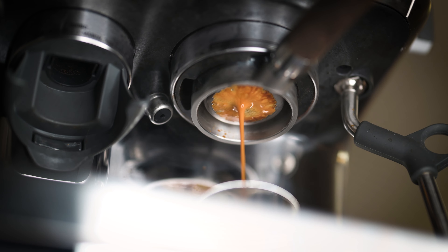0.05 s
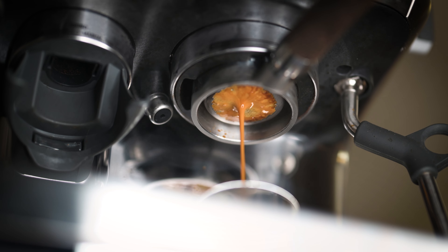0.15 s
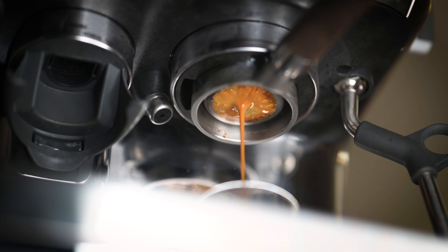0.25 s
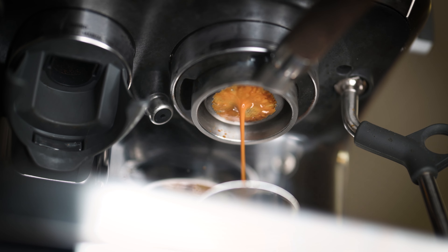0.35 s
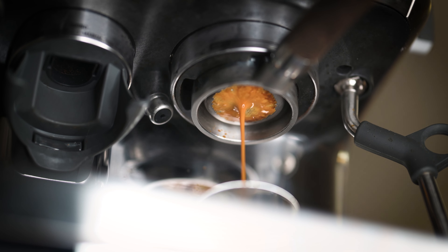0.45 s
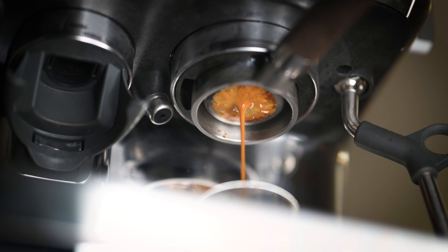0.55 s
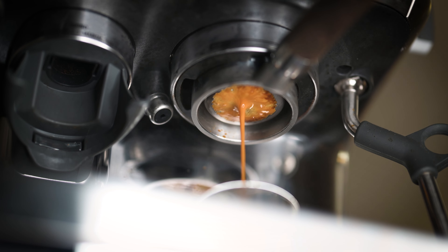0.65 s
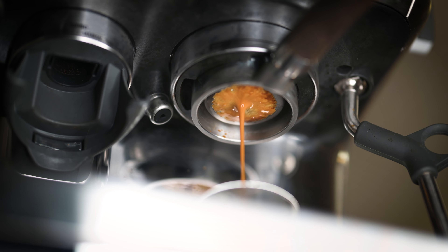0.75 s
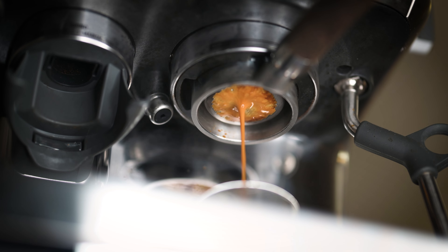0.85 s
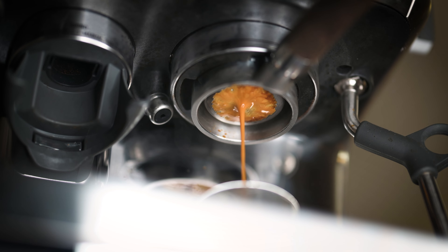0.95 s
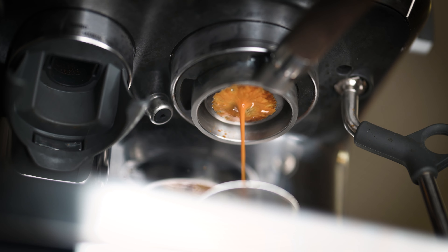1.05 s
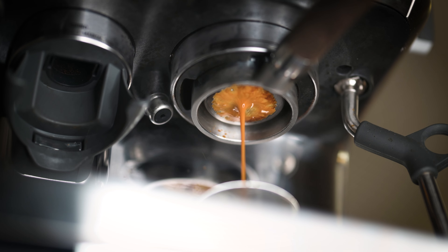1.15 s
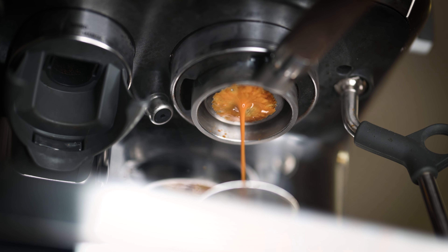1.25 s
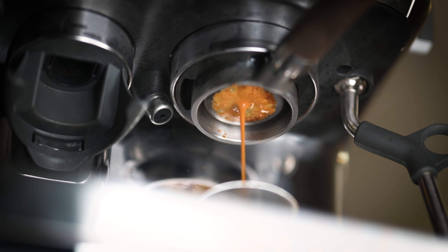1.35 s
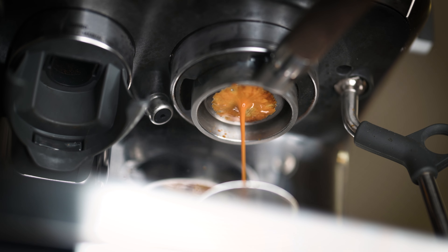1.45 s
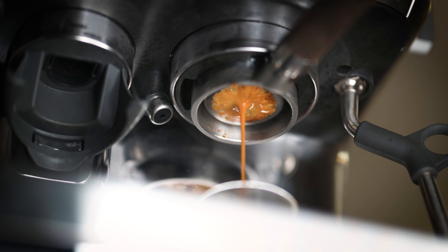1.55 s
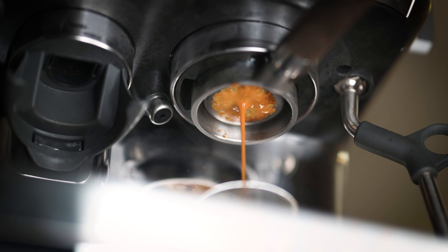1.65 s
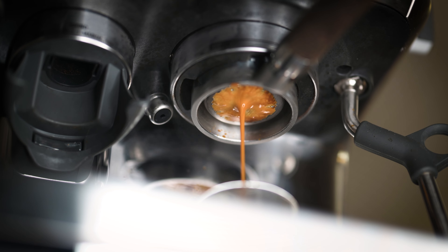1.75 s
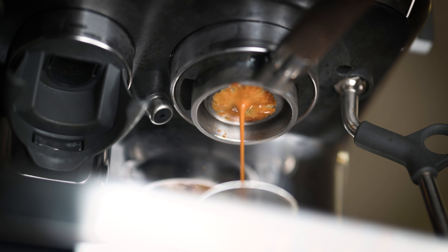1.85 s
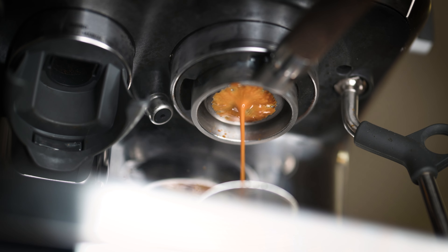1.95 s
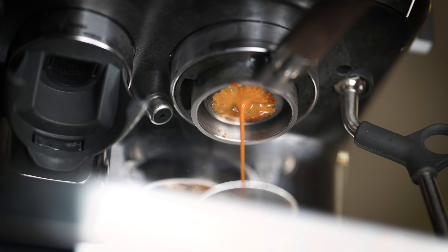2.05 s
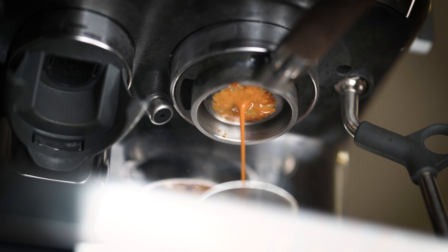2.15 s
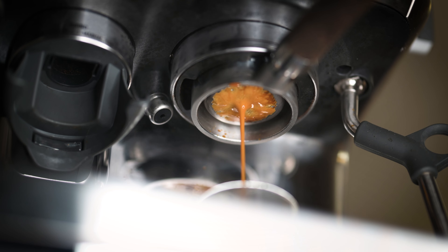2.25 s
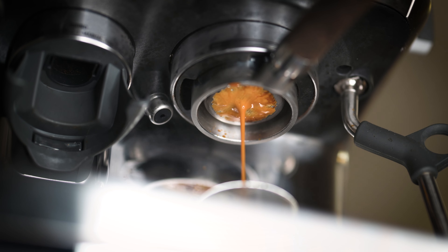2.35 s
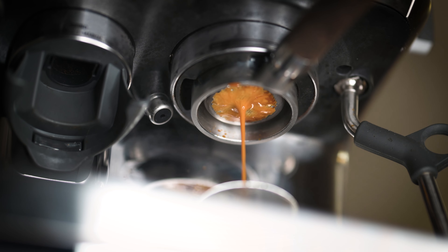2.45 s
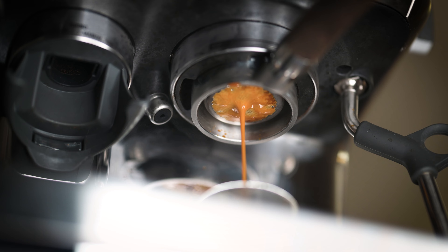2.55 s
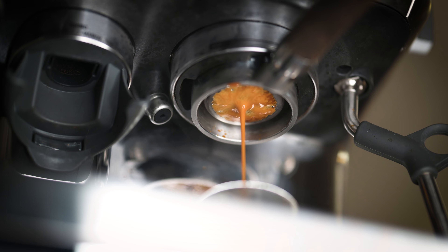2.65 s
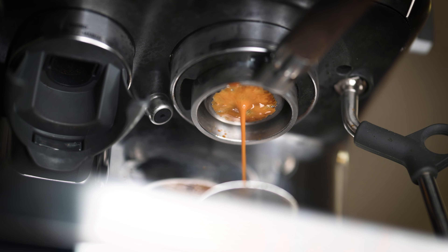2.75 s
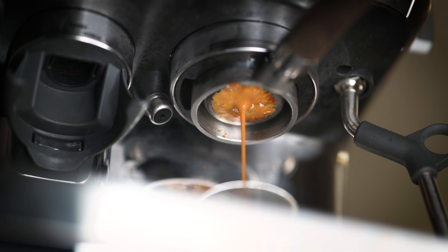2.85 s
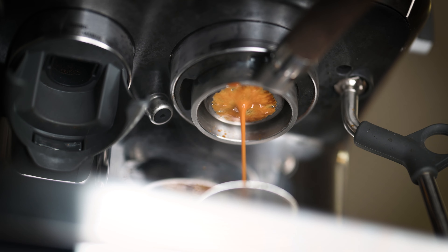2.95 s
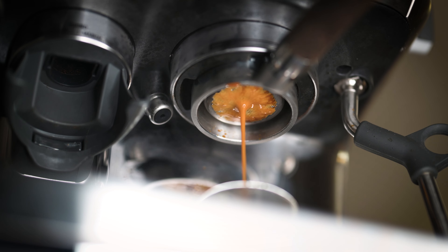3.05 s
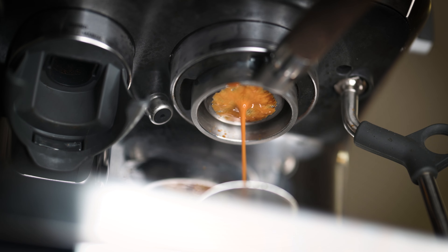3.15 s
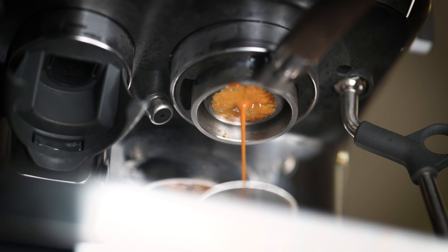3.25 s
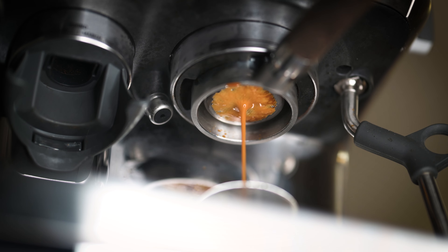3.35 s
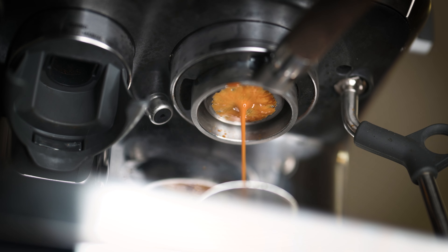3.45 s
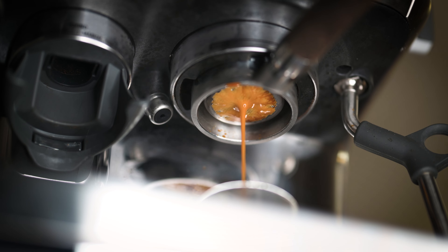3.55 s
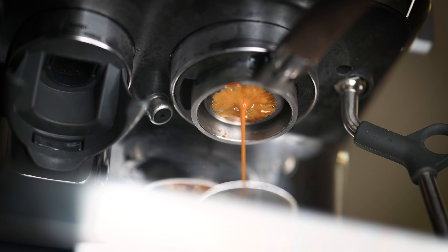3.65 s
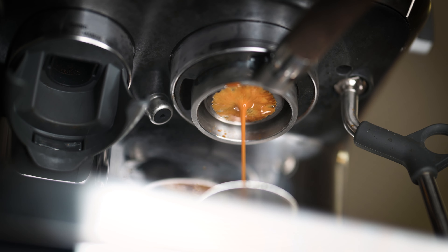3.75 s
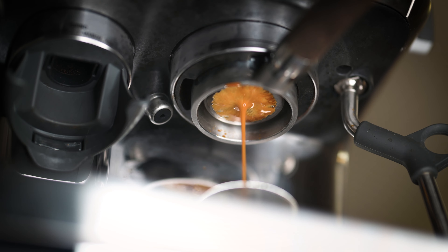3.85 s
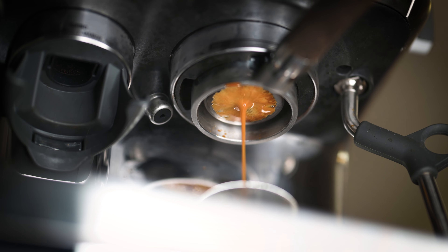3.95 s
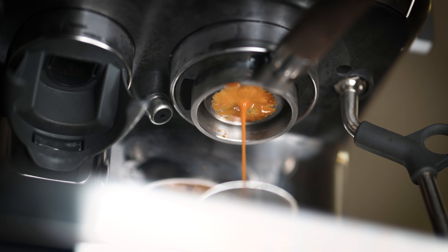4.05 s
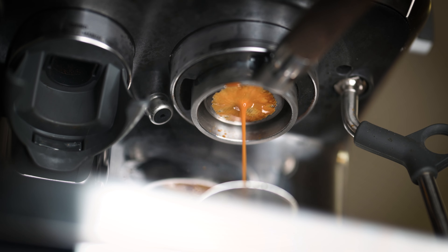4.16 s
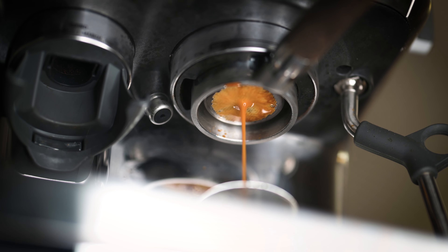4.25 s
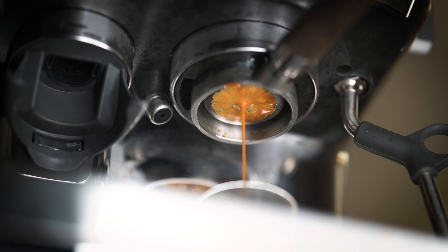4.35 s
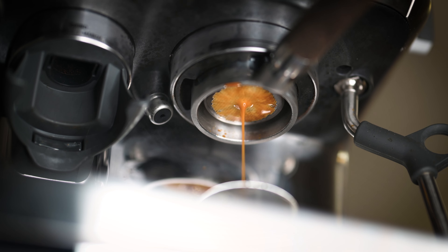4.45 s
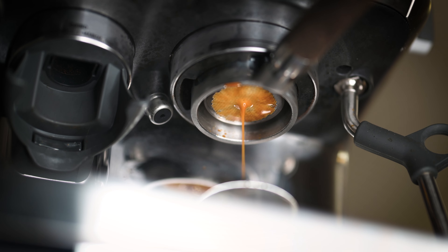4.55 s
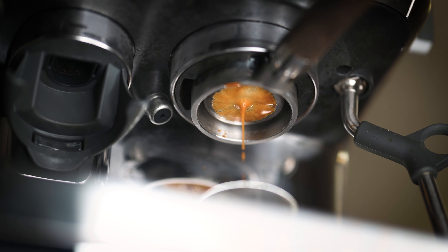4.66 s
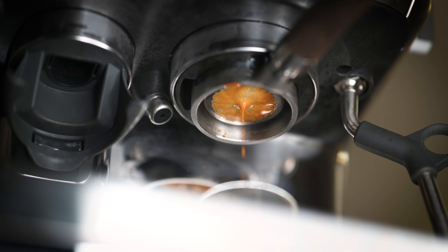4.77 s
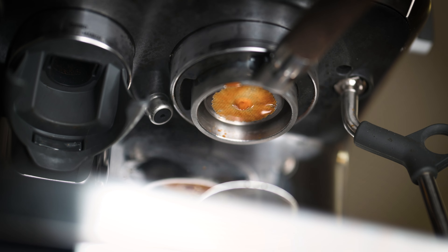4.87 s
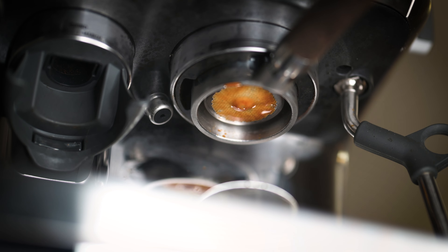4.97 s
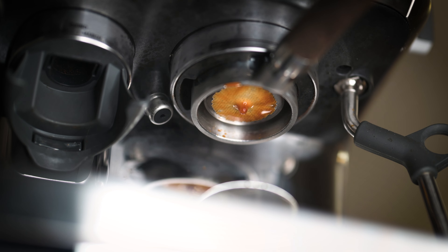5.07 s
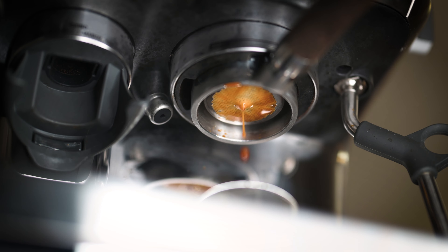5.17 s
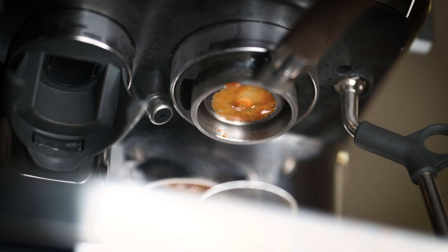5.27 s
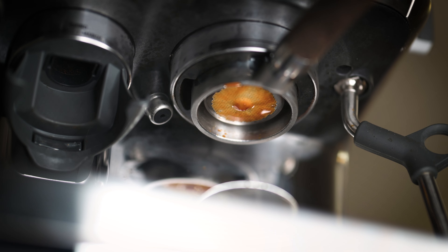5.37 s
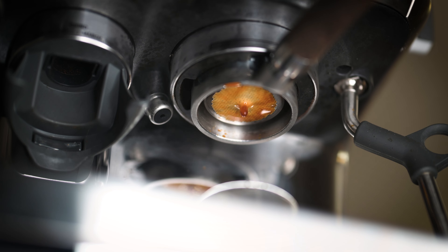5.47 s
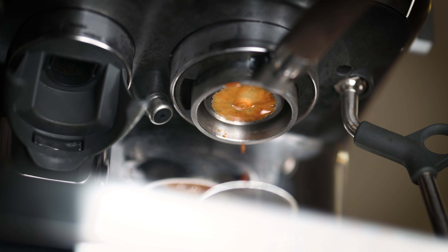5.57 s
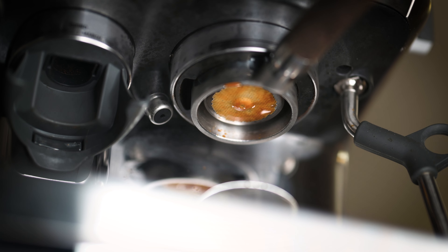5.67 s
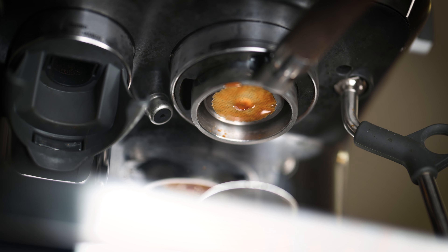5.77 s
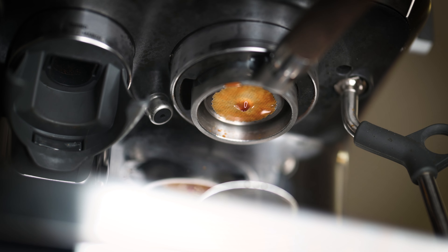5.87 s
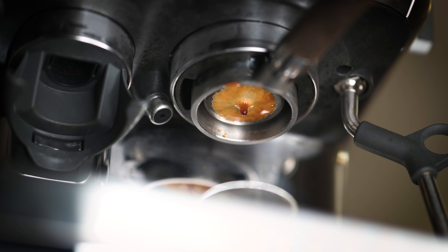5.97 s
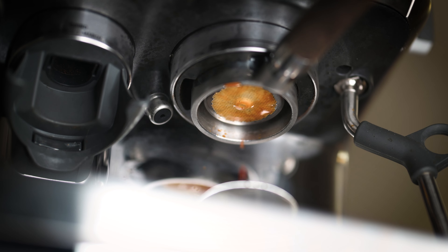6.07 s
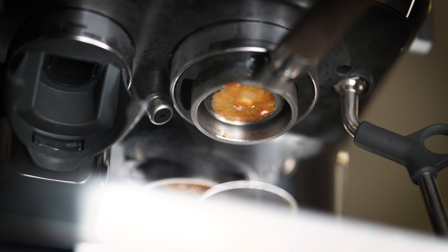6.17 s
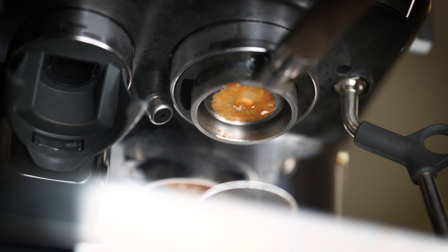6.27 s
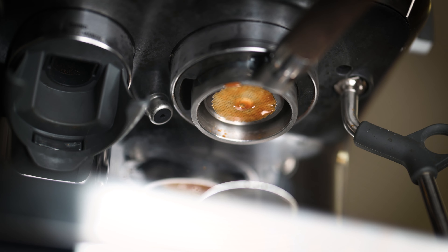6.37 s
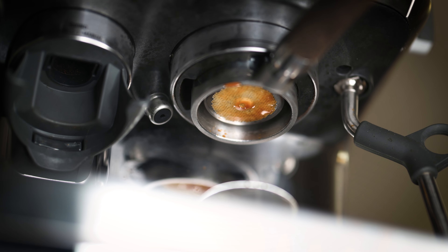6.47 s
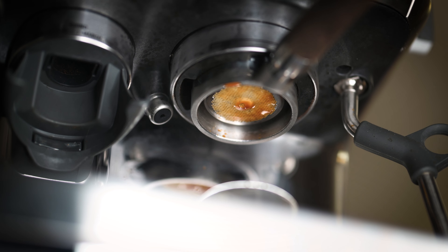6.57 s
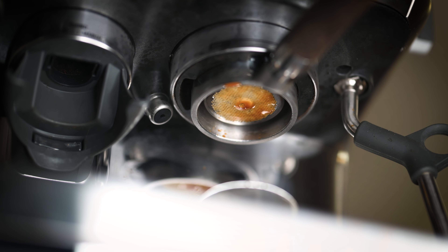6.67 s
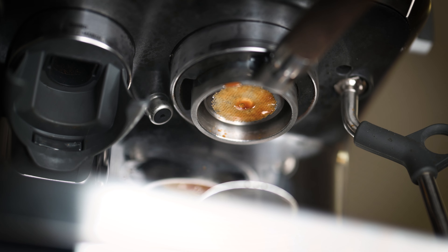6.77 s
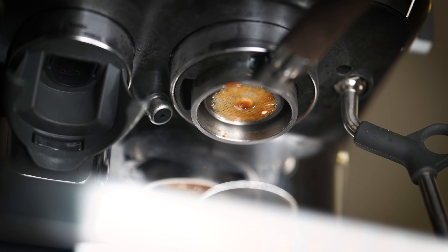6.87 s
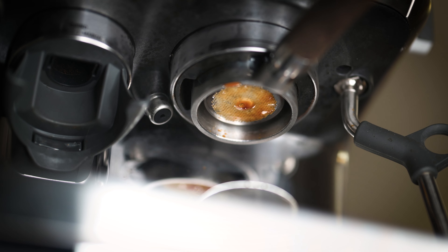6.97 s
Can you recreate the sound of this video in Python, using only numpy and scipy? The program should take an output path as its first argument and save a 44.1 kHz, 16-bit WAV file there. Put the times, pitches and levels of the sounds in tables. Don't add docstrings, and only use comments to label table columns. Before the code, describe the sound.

A vibrating coffee pump drones and buzzes for about three seconds, metal rattling and water fizzing, with scattered creaks. The buzz dies abruptly into gritty creaks and small clicks of a turning lever, ended by one loud metallic slam and quick rebounds. Then come palm rubbing, tiny skin squeaks, light knocks and hollow panel thumps, over low hum. Captured close in stereo in a small, slightly reverberant kitchen.

```python
import sys
import numpy as np
from scipy import signal
from scipy.fft import rfft, irfft, next_fast_len
from scipy.io import wavfile
from scipy.ndimage import map_coordinates

SR = 44100
rng = np.random.default_rng(int(sys.argv[2]) if len(sys.argv) > 2 else 0)


def store_wav(level_fs):
    pcm = np.round(np.clip(np.atleast_2d(level_fs), -1, 1) * 32767)
    wavfile.write(sys.argv[1], SR, pcm.T.astype(np.int16))


def convert_level_to_amplitude(level_db):
    exponent = np.asarray(level_db, float) / 20
    return 10 ** exponent


N = 309582
TIME_S = np.arange(N) / SR
MAINS_HZ = 59.989
OFF_S = 3.289


def unit(x):
    return x / np.sqrt(np.mean(x ** 2) + 1e-20)


def along(points, hz):
    f, v = np.transpose(points)
    return np.interp(np.log(hz + 1), np.log(f + 1), v)


def curve(rows):
    s, value = np.transpose(rows)
    return np.interp(TIME_S, s, value)


def wobble(rate):
    coarse = np.arange(0, N + 32, 32)
    knots = rng.standard_normal(int(N * rate / SR) + 5)
    return np.interp(np.arange(N), coarse, map_coordinates(knots, [coarse * rate / SR]))


def between(start_s, end_s, fade_s):
    inside_s = np.minimum(TIME_S - start_s, end_s - TIME_S)
    return np.clip(inside_s / fade_s + .5, 0, 1)


def dying(t60):
    return -60 * np.maximum(TIME_S - OFF_S, 0) / t60


def filtered(x, response):
    m = next_fast_len(N + SR // 2)
    return irfft(rfft(x, m) * response(np.fft.rfftfreq(m, 1 / SR)), m)[..., :N]


def modes(peaks):
    def response(f):
        total = 0
        for k, (centre, width, db) in enumerate(peaks):
            damping = 1j * f * width
            total = total + (-1) ** k * convert_level_to_amplitude(db) * damping / (centre * centre - f * f + damping)
        return total
    return response


def band(spectrum, lo_hz=0, hi_hz=SR):
    return lambda f: convert_level_to_amplitude(along(spectrum, f)) / (1 + (lo_hz / (f + 1)) ** 6) / (1 + (f / hi_hz) ** 6)


def hiss(response, gate=1):
    return unit(filtered(gate * rng.standard_normal((2, N)), response))


def lasting(rows, t60):
    return [(*row, t60) for row in rows]


def bursts(rows, column, shorter):
    x, t = np.zeros(N + SR), np.arange(SR // 3) / SR
    noise = rng.standard_normal((len(rows), len(t)))
    noise[:, :4] = 1.5 * np.sign(noise[:, :1])
    for row, grit in zip(rows, noise):
        db = row[1] + (row[column] if column else 0)
        t60 = shorter * max(row[-1], .004)
        x[round(row[0] * SR):][:len(t)] += convert_level_to_amplitude(db - 60 * t / t60) * grit
    return x[:N]


def pings(rows, shorter):
    x, t = np.zeros(N + SR), np.arange(SR // 4) / SR
    for s, db, *_, hz, t60 in rows:
        swing = np.sin(2 * np.pi * hz * t) * (1 - np.exp(-t / 0.00011))
        x[round(s * SR):][:len(t)] += convert_level_to_amplitude(db - 60 * t / (shorter * max(t60, .004))) * swing
    return x[:N]


def spread(x):
    n = SR // 40
    smear = rng.standard_normal(n) * convert_level_to_amplitude(-40 * np.arange(n) / n)
    return np.array([x, signal.fftconvolve(x, smear / np.linalg.norm(smear))[:N]])


def quadrature(x):
    return np.array([x, signal.hilbert(x, next_fast_len(N))[:N].imag])


# frequency_hz, correlation
ALIKE = [(60, 0.993), (150, 1), (380, 0.97), (650, 0.98), (950, 0.89), (2380, 0.66), (5980, 0.059),
         (15000, 0.26)]


def ports(pair):
    def turn(hz):
        return np.arccos(np.clip(along(ALIKE, hz), -1, 1)) / 2
    mid, side = filtered(pair, lambda hz: np.array([np.cos(turn(hz)), np.sin(turn(hz))]))
    return np.array([mid + side, mid - side])


# frequency_hz, t60_s
KITCHEN = [(200, 0.058), (2000, 0.48), (10000, 0.15)]


def kitchen(x):
    hz, t, z = signal.stft(rng.standard_normal((2, SR // 2)), SR, nperseg=256)
    decay = convert_level_to_amplitude(-60 * t / along(KITCHEN, hz)[:, None])
    tail = signal.istft(z * decay, SR, nperseg=256)[1]
    late = np.pad(x, (300, 0))[None]
    return signal.fftconvolve(late, tail / np.linalg.norm(tail[0]), axes=1)[:, :N]


# frequency_hz, density_db_per_hz
AIR = [(25, -19), (70, -12.5), (94, -13), (149, -14), (190, -21), (384, -25.5), (754, -29), (1650, -30.5),
       (4000, -40), (13600, -45.5), (14800, -44), (15300, -37), (16000, -56)]


def air():
    return convert_level_to_amplitude(-57.0 + 1.0 * wobble(2.77)) * hiss(band(AIR))


# pitch_hz, level_db
WHINE = [(7607, -99), (10137, -90.5), (14896, -99), (15240, -77.5)]


def hum():
    coil_db, hum_db, motor_db = -47.5, -44.5, -61
    motor_hz, motor_peak_s = 58.73, .07
    coil_dying_db = dying(0.14)
    cycle = MAINS_HZ * TIME_S - .4
    slip = (MAINS_HZ - motor_hz) * (TIME_S - motor_peak_s)
    hum_db = hum_db + 3 * convert_level_to_amplitude(coil_dying_db)
    double_hum = convert_level_to_amplitude(hum_db + 0.32 * wobble(6.5)) * np.cos(4 * np.pi * cycle + .08 * wobble(3.8))
    coil = convert_level_to_amplitude(coil_db + coil_dying_db + 0.45 * wobble(9.1)) * np.cos(2 * np.pi * cycle + 0.05 * wobble(10))
    motor = convert_level_to_amplitude(motor_db + 1.5 * wobble(13)) * np.cos(2 * np.pi * (cycle - slip) + 0.16 * wobble(9.2))
    whine = sum(convert_level_to_amplitude(db) * np.sin(2 * np.pi * hz * TIME_S + .5 * wobble(22)) for hz, db in WHINE)
    return np.sqrt(2) * quadrature(double_hum + coil + motor + whine)


# time_s, pressure_db
HAND = [
    (4.33, -14),
    (4.43, 5.5),
    (4.62, 2.5),
    (4.93, -1.5),
    (5.19, -1),
    (5.37, 4),
    (5.61, 4.5),
    (6.25, 1.5),
    (6.46, -12),
    (6.9, -22),
]
# frequency_hz, density_db_per_hz
RUB = [(120, -42), (200, -4.5), (281, -4.5), (380, 0), (472, -7), (601, -2.5), (1060, -12), (1600, -9.5),
       (1850, -12.5), (2660, -12), (3600, -20.5), (4680, -49), (7920, -120)]
# pitch_hz, width_hz, level_db
SQUEAK = [(4100, 270, 7), (3700, 240, -9.5)]
# frequency_hz, density_db_per_hz
SCUFF = [(2530, -5), (4300, 0), (5450, 1), (6010, -5), (6570, -3.5), (7130, -9.5), (7870, -5.5),
         (8600, -14), (11200, -11.5), (15100, -25.5), (16000, -28)]
# level_db, growth_db_per_db of pressure
GRIP = [
    (-55, 0.55),
    (-55.5, 1.23),
    (-69.5, 2),
    (-51.5, 0),
]


def rubbing():
    colours = band(RUB, 0, 890), band(RUB, 820), modes(SQUEAK), band(SCUFF)
    lumps_db = 1.2, 1, 3.5, 2
    pressure_db = np.maximum(curve(HAND), -30)
    levels_db = [db + grows * pressure_db for db, grows in GRIP]
    levels_db[-1] = levels_db[-1] - 9 * (TIME_S - HAND[0][0])
    grain_db = 0.73 * wobble(90)
    rub = 0
    for db, colour, lump_db in zip(levels_db, colours, lumps_db):
        rub = rub + convert_level_to_amplitude(db) * hiss(colour, convert_level_to_amplitude(grain_db + lump_db * wobble(40)))
    return between(HAND[0][0], N / SR + 1, 0.028) * rub


# start_s, length_s, level_db, from_hz, to_hz
CHIRPS = [(4.451, .04, -49, 3900, 4200), (4.543, 0.066, -52, 4000, 4040), (4.9, .06, -56, 5700, 5300),
          (4.6, 0.046, -66, 4300, 4900), (4.493, 0.04, -54, 4000, 4120), (4.554, 0.04, -51, 2900, 2900),
          (4.722, 0.068, -60, 4900, 4500), (4.78, 0.052, -61, 4150, 4000), (5.381, 0.14, -54, 1400, 1235),
          (5.671, 0.107, -53, 2200, 1900), (5.685, 0.11, -60, 4100, 4100), (5.857, 0.36, -59, 1600, 1610),
          (6.148, 0.04, -61, 4100, 4100)]


def chirps():
    width_hz = 520
    x = np.zeros((2, N))
    for s, length, db, from_hz, to_hz in CHIRPS:
        n = round(length * SR)
        places = np.meshgrid([0, 1], np.arange(n) * width_hz / SR, indexing="ij")
        waver = map_coordinates(rng.standard_normal((2, 300)), places)
        swing = np.sin(2 * np.pi * np.cumsum(np.linspace(from_hz, to_hz, n)) / SR)
        x[:, round(s * SR):][:, :n] += convert_level_to_amplitude(db) * 2 * np.sqrt(np.hanning(n)) * waver * swing
    return x


# start_s, peak_db, pitch_hz
CREAKS = [(.0238, -22, 2160), (.637, -25.5, 2140), (.6594, -31, 1920), (.8315, -25, 2230),
          (.9268, -37, 2290), (1.098, -35, 2014), (1.3833, -30, 2150), (1.9704, -32.5, 2007),
          (2.381, -37, 2020), (2.9994, -39, 2570)]
# start_s, peak_db, pitch_hz
SLIPS = [(3.3304, -37, 2160), (3.3723, -35, 1930), (3.379, -28, 1230), (3.3882, -34, 2100),
         (3.4768, -41, 2480), (3.4865, -36, 2140), (3.5084, -35, 1900), (3.5319, -34.5, 2554),
         (3.5818, -38, 1970), (3.6022, -34.5, 2650), (3.6387, -32.5, 2050), (3.701, -37, 1960),
         (3.723, -45, 2140), (3.7773, -33, 2560), (3.8018, -33.5, 1880), (3.8577, -41, 1980),
         (3.8756, -31, 2630), (3.9385, -34.5, 2630), (3.9762, -34, 2430), (3.9859, -30, 1990),
         (4.0253, -31.5, 2100), (4.2109, -30.5, 2470), (4.221, -32.5, 1990),
         (3.41, -35, 1150), (3.498, -37, 2600), (3.629, -35, 2500), (3.65, -32.5, 2030),
              (3.7924, -36, 1160), (3.887, -35, 2010), (3.95, -37, 2000), (4.0337, -36.5, 2120),
              (4.231, -40, 2000)]
# start_s, peak_db, pitch_hz
TICKS = [(3.3493, -58, 3700), (3.365, -47, 3300), (3.379, -47, 4700), (3.4055, -56, 3600),
         (3.4765, -43, 5720), (3.5124, -46.5, 3780), (3.5309, -42, 5720), (3.6022, -49.5, 3660),
         (3.6137, -45, 3640), (3.6385, -41.5, 3500), (3.6831, -47, 3810), (3.7763, -52, 3530),
         (3.7923, -41, 3600), (3.8162, -43, 5690), (3.8746, -52.5, 3600), (3.8886, -46, 3930),
         (3.9375, -50, 3620), (3.9529, -47.5, 3680), (3.9762, -35, 5830), (4.0247, -42, 3800),
         (4.0956, -59, 3450), (4.1126, -45, 3700), (4.161, -50.5, 3630), (4.2104, -44, 3610),
         (4.24, -45.5, 4680),
         (3.4087, -52, 3910), (3.421, -52, 4300), (3.4314, -51, 4790), (3.4974, -47, 3540),
              (3.5594, -50, 4010), (3.5774, -51, 3710), (3.629, -48, 3600), (3.6606, -55, 3550),
              (3.6994, -51, 5600), (3.8594, -50.5, 4200), (3.899, -43, 3990), (4.0314, -46.5, 3670),
              (4.0851, -49.5, 3700), (4.1674, -47, 5720)]
# start_s, peak_db, pitch_hz
CRACKLES = [(4.4774, -43, 8500), (4.6374, -47, 8000), (4.7242, -57, 4630), (4.8309, -45, 7950),
            (4.8603, -42, 3760), (5.011, -46, 7900), (5.043, -51, 4100), (5.0694, -46, 4980),
            (5.101, -58, 8000), (5.1187, -44, 3870), (5.1741, -51, 4640), (5.2105, -36, 3570),
            (5.2365, -37.5, 8050), (5.2494, -36, 7900), (5.305, -41, 3900), (5.384, -50, 3950)]
# start_s, peak_db
BRIGHT_TICKS = [
    (3.4042, -47.5),
    (3.976, -35),
    (4.0243, -44.5),
]
# pitch_hz, width_hz, level_db
LEVER = [(221, 73, -2), (601, 97, 0), (1150, 110, -2), (1325, 147, -1.5), (2014, 90, 0), (2140, 72, 0.5),
         (2280, 220, -2), (2530, 310, -4)]
# frequency_hz, density_db_per_hz
TICK = [(1760, -49), (3000, -12), (3680, 1.5), (5800, -7), (6170, -7.5), (8460, -6), (14900, -20.5),
        (16000, -12)]
# frequency_hz, density_db_per_hz
TICK_TOP = [(7000, -40), (9000, -3.5), (12000, -9), (14000, -5), (15800, -5)]


def lever():
    creaks = lasting(CREAKS, 0.13) + lasting(SLIPS, 0.052)
    ticks = lasting(TICKS, 0.016) + lasting(CRACKLES, 0.032)
    ring = convert_level_to_amplitude(2.5) * filtered(bursts(creaks, column=0, shorter=1.0), modes(LEVER))
    ring = ring + convert_level_to_amplitude(-5.0) * pings(creaks, shorter=0.28)
    tick = convert_level_to_amplitude(3.5) * filtered(bursts(ticks, column=0, shorter=0.99), band(TICK))
    tick = tick + convert_level_to_amplitude(-4.0) * pings(ticks, shorter=0.79)
    bright = convert_level_to_amplitude(3.5) * filtered(bursts(lasting(BRIGHT_TICKS, 0.054), column=0, shorter=0.76), band(TICK_TOP))
    large_slips = convert_level_to_amplitude(rng.uniform(0, 18, N)) * (rng.random(N) < 500 / SR)
    grains = rng.standard_normal(N) * (0.22 + large_slips)
    drag = unit(filtered(grains, lambda f: modes(LEVER)(f) + 0.11 * band(TICK)(f)))
    turn_s, turned_s = 3.28, 4.3
    turning = between(turn_s, turned_s, .03) * convert_level_to_amplitude(-57 + 2.6 * wobble(25))
    resting = between(-1, turn_s, .03) * convert_level_to_amplitude(-51 + 0.99 * wobble(25))
    return ring + tick + bright + (turning + resting) * drag


# start_s, peak_db, pitch_hz
CLATTER = [(4.2543, -8.5, 3000), (4.2657, -21.5, 1680), (4.275, -18, 1880), (4.2896, -22, 2900),
           (4.2935, -16, 3770), (4.299, -21.5, 2670), (4.309, -21, 2500), (4.327, -22.5, 3770),
           (4.338, -27.5, 2900), (4.35, -26.5, 1640), (4.373, -30, 1620)]
# start_s, peak_db, bright_db, thud_db, pitch_hz
KNOCKS = [(4.4578, -33.5, -25, -9, 1730), (4.499, -39, -20, -21, 3940), (4.539, -34, -29, -9.5, 2980),
          (4.6189, -31.5, -35, -30, 2800), (4.791, -42.5, -21, -9.5, 1640), (4.809, -39.5, -30, -20, 1660),
          (4.899, -38, -8.5, -27, 5530), (5.2109, -42.5, -10, -13, 1670), (5.4388, -48, -14, -4, 1710),
          (5.6945, -37, -24, -17, 2740), (5.989, -37, -37, -24, 1610), (6.2743, -23, -34, -18, 1620),
          (6.298, -34, -33, -20, 2150), (6.323, -39.5, -32, -4, 1540), (6.351, -42, -34, -11, 1590),
          (6.366, -41, -36, -11, 1600), (6.387, -50, -34, -12, 1610), (6.4663, -50, -28, -15, 2620),
          (6.655, -48.5, -21, -9, 1760), (6.7508, -50, -25, -6.5, 1750), (6.8125, -45.5, -32, -11, 1650),
          (6.91, -55, -27, -1, 1457), (6.988, -49, -29, -8, 1700)]
# start_s, peak_db, pitch_hz
HOLLOW = [(4.458, -36, 385), (4.54, -38, 610), (4.788, -52, 342), (5.099, -51, 336), (5.384, -38, 385),
          (5.5, -44, 380), (5.735, -40, 410), (5.847, -49, 374), (5.944, -39, 390), (6.2745, -28.5, 600),
          (6.278, -36, 2750), (6.274, -39, 3780), (6.29, -48, 3700), (6.277, -40, 3280), (6.288, -36, 2050),
          (6.322, -41, 600), (6.345, -44, 680)]
# start_s, peak_db
WEIGHT = [
    (4.258, -28.5),
    (4.2734, -29.5),
    (4.288, -43.5),
]
# pitch_hz, width_hz, level_db
BODY = [(1100, 380, -3), (1620, 380, -2), (2150, 420, -5), (2700, 480, -3), (3250, 450, -6),
        (3850, 600, -7), (4500, 600, -7), (5050, 500, -8)]
# pitch_hz, width_hz, level_db
TRAY = [(225, 90, -2), (398, 90, 4), (600, 167, -2.5), (830, 370, -9)]
# frequency_hz, density_db_per_hz
SNAP = [(2940, -8), (5000, -3.5), (5530, -8.5), (6450, 0), (7570, -6.5), (9380, -8.5), (13600, -14.5),
        (15000, -13), (16200, -18.5), (16500, -44)]


def knocks():
    knock_t60_s = 0.089
    clatter = [(s, db, -15, -20.5, hz) for s, db, hz in CLATTER]
    hard_rows, soft_rows = lasting(clatter, knock_t60_s), lasting(KNOCKS, knock_t60_s)
    blows = hard_rows + soft_rows
    hard = convert_level_to_amplitude(0.94 * wobble(200)) * bursts(hard_rows, column=0, shorter=0.78)
    soft = convert_level_to_amplitude(0.94 * wobble(200)) * bursts(soft_rows, column=0, shorter=0.78)
    soft = filtered(soft, band([(100, 0), (4000, 1.4)], 0, 4200))
    body = filtered(hard + soft, modes(BODY))
    snap = filtered(bursts(blows, column=2, shorter=0.5), band(SNAP))
    weight = bursts(lasting(WEIGHT, knock_t60_s), column=0, shorter=1.6)
    thud = filtered(bursts(blows, column=3, shorter=2.6) + weight, modes(TRAY))
    rings = convert_level_to_amplitude(-2.0) * pings(blows[1:], shorter=.4) + pings(lasting(HOLLOW, .05), shorter=0.98)
    return convert_level_to_amplitude(2.0) * body + convert_level_to_amplitude(13.0) * snap + convert_level_to_amplitude(15.5) * thud, rings


# pitch_hz, level_db, t60_s
SLAM = [(1700, -9, .022), (2980, 1.5, .014), (3250, -9, .012), (9500, -16, .012)]


def slam():
    t = np.maximum(TIME_S - CLATTER[0][0], 0)
    rise = 1 - np.exp(-t / .0015)
    return sum(convert_level_to_amplitude(db - 60 * t / t60) * rise * np.sin(2 * np.pi * hz * t) for hz, db, t60 in SLAM)


EARLY_IN_SPURT = .0122
STRIKE, SCATTER = .03, .08
LOADED_S = np.minimum(TIME_S, OFF_S) - OFF_S / 2
# start_s, end_s
SPURTS = [
    (0, 0.49),
    (.58, .68),
    (2.391, 3.3),
]


def spurting():
    spans = [(-1, SPURTS[0][1]), SPURTS[1], (SPURTS[2][0], 9)]
    return sum(between(start, end, .03) for start, end in spans)


# level_db, growth_db_per_db of overshoot, t60_s after switch-off
PARTS = [
    (-32.5, 0.34, 0.28),
    (-31.5, 1.2, 0.036),
    (-42, -0.17, 0.24),
    (-48.5, 0.33, 0.06),
]
# mains_multiple, level_db
STROKE = [(1, -11), (2, -6), (3, -12.5), (4, -1), (5, 0.5), (6, -7.5), (7, 3.5), (8, -1.5), (9, -6),
          (10, 7.5), (11, 7.5), (12, -13), (13, -12.5), (14, -14.5), (15, -29.5), (16, -13), (17, -29),
          (18, -35.5), (19, -7.5), (20, -14.5), (21, -24), (22, -24.5), (23, -40), (24, -19), (25, -59),
          (26, -25.5), (27, -24.5), (28, -28.5), (29, -22.5), (30, -30)]
BLOW = [
    (.085, .76),
    (.62, .76),
    (.545, .7),
]
SETTLING = {4: 0.65, 5: 0.23, 6: 0.19, 8: -0.91, 10: 0.23, 11: -0.9, 12: -1.2, 13: -2.4, 14: -0.28, 15:
            -1.3, 16: 0.75, 19: 1.64, 20: 0.83}
SPURTING = {3: 2, 4: 2, 5: .3, 6: 3.7, 7: 1.3, 8: -2.2, 10: 0.95, 11: -0.61, 13: 1.5, 15: -1.7, 18: 1.7, 21:
            -1.5, 22: 4.4, 24: -3.5}


def piston_tone(levels_db, spurt, cycle):
    parts = np.zeros((3, N))
    for k, db in STROKE[2:]:
        part = int(k > 8) + int(k > 13)
        at, offset = BLOW[part]
        lag = k * at - offset
        lag += 0.03024 * max(k - 12, 0) ** 2
        if part == 0:
            lag += .07 * (-1) ** k
        if part == 1:
            lag += .3 * (int(k > 11) - int(k < 10))
        level_db = db + SETTLING.get(k, 0) * LOADED_S + SPURTING.get(k, 0) * spurt
        swing = np.cos(2 * np.pi * (k * cycle - lag) + 0.063 * wobble(6.6))
        parts[part] += convert_level_to_amplitude(level_db + 0.32 * wobble(1.8)) * swing
    return sum(convert_level_to_amplitude(db) * unit(part) for db, part in zip(levels_db, parts))


def piston_blows(spurt):
    period = SR / MAINS_HZ
    at = np.arange(1, 3.275 * MAINS_HZ) * period
    at = (at - EARLY_IN_SPURT * period * spurt[at.astype(int)])[:, None]
    near = at.astype(int) + np.arange(-7, 9)
    pulse = np.sinc(near - at) * np.cos(np.pi * (near - at) / 16) ** 2
    size = convert_level_to_amplitude(rng.normal(0, .8, at.shape)) * pulse
    blows = np.bincount(near.ravel(), size.ravel(), N)
    return blows + convert_level_to_amplitude(-7) * np.roll(blows, int(.47 * period))


# pitch_hz, width_hz, level_db
CASING = [(2100, 220, 0), (2630, 67, 8), (2900, 120, -3.5), (3300, 180, -7.5), (3780, 125, -2.5),
          (4040, 93, -13), (4300, 210, -1), (4530, 91, 1), (4920, 83, 4.5), (5370, 75, 0), (5850, 140, -1),
          (6460, 130, -23), (6450, 280, -13.5), (7180, 160, -17), (8500, 150, -34), (9330, 550, -11),
          (10360, 370, -16)]
# in_spurt_db, slope_db_per_s
CASING_MOVES = [(-2.5, 1.5), (-3, 0.7), (3, 0), (-4, -.6), (0, 2.2), (13, -2), (-6.5, -3), (-1.5, 3.5),
                (-0.8, 1.3), (0.5, 0), (0, 0.7), (.1, -4), (.1, .1), (6, 1), (.1, .1), (-3, 0.8), (2, -1)]


def casing_rattle(spurt):
    blows = piston_blows(spurt)
    rattle = np.zeros(N)
    for (hz, width, db), (spurt_db, settle_db) in zip(CASING, CASING_MOVES):
        late = np.roll(blows, int((STRIKE + SCATTER * rng.random()) * SR / MAINS_HZ))
        narrow, broad = modes([(hz, width, db)]), modes([(hz, 3 * width, 0)])
        ring = filtered(late, lambda f: narrow(f) * broad(f))
        rattle += convert_level_to_amplitude(spurt_db * spurt + settle_db * LOADED_S + .8 * wobble(2.2)) * ring
    return unit(rattle)


# frequency_hz, density_db_per_hz
SPRAY = [(88, -49), (150, -24), (297, -11.5), (366, -7.5), (420, -5), (538, -15), (601, -0.5), (770, -15),
         (962, -19.5), (1050, -4.5), (1160, -13.5), (1520, -16), (2900, -24), (3770, -58), (6380, -120)]
# frequency_hz, density_db_per_hz
FIZZ = [(1590, -25), (2700, 1), (3230, -4), (3770, -4), (4130, -6.5), (4380, -3.5), (4970, -5),
        (5160, -4.5), (6080, -7), (6700, -12), (7830, -13), (10100, -12), (12600, -16.5), (15200, -17.5),
        (16000, -19.5)]


def water(spurt, cycle):
    base_db, jet_dying_db = PARTS[-1][0], dying(0.39)
    gate = 1 + .3 * np.cos(2 * np.pi * (cycle - .2)) + .25 * np.cos(4 * np.pi * (cycle - .2))
    valve = .6 + np.exp(.7 * np.cos(2 * np.pi * (cycle - STRIKE - SCATTER / 2))) * .5
    gulps = between(.58, .69, .03) + between(2.37, 2.53, .03)
    slosh_db = base_db + dying(1) - 0.8 + 5 * gulps + .8 * wobble(6)
    slosh = convert_level_to_amplitude(slosh_db) * hiss(band(SPRAY, 0, 2800), gate)
    jet = convert_level_to_amplitude(base_db + jet_dying_db - 3.5) * hiss(band(FIZZ, 3140, 12000), valve)
    finest = convert_level_to_amplitude(-63 + 6 * spurt + jet_dying_db) * hiss(band(FIZZ, 11700), valve)
    return slosh + jet + finest


# time_s, overshoot_db
PUMP = [(0.0, 0.5), (0.42, 0), (0.55, -1.5), (0.64, 1.5), (0.7, -1.5), (0.84, 0), (1.48, -2), (2.05, -3.5),
        (2.36, -3.5), (2.46, -2), (2.6, -1.5), (3.3, -1.5)]


def pump():
    overshoot_db, spurt = curve(PUMP), spurting()
    cycle = MAINS_HZ * TIME_S + EARLY_IN_SPURT * spurt
    *tone_db, rattle_db = [db + grows * overshoot_db + dying(t60) for db, grows, t60 in PARTS]
    tone = quadrature(piston_tone(tone_db, spurt, cycle))
    rattle = spread(convert_level_to_amplitude(rattle_db - 2.15) * casing_rattle(spurt))
    return tone + rattle + water(spurt, cycle)


def scene():
    near, (loud, rings), first = lever(), knocks(), slam()
    room = kitchen(convert_level_to_amplitude(-8) * near + convert_level_to_amplitude(-3.5) * loud + convert_level_to_amplitude(-13) * (rings + first))
    contacts = spread(near + loud + rings) + quadrature(first)
    return ports(hum() + air() + rubbing() + chirps() + contacts + pump() + room)


def low_pass(x):
    return signal.sosfilt(signal.butter(12, 16850, fs=SR, output="sos"), x)


# frequency_hz, left_minus_right_db
LEAN = [(60, 0.5), (150, -1), (380, 0), (950, 0), (2380, -2), (5980, 1.5), (15000, 2)]


def record(dry):
    top_hz = 15850

    def response(f):
        balance = convert_level_to_amplitude(np.outer([.5, -.5], along(LEAN, f)))
        return balance * np.where(f < top_hz, 1, .03)
    return low_pass(filtered(dry, response))


dry = scene()
out = record(dry)
store_wav(out)
```